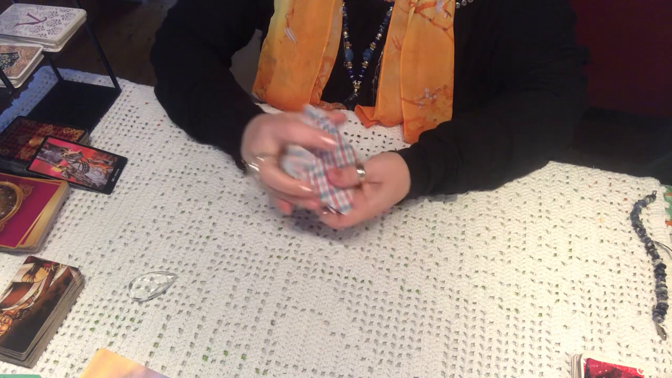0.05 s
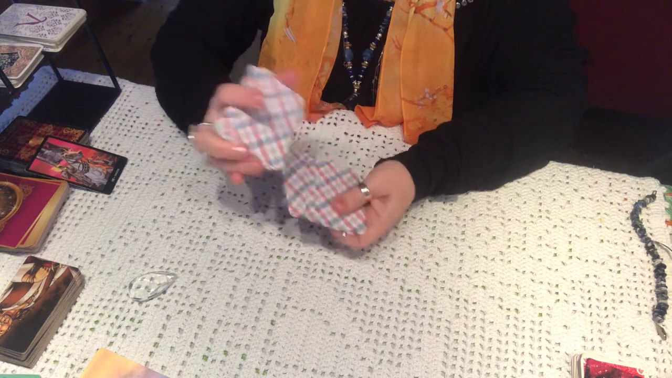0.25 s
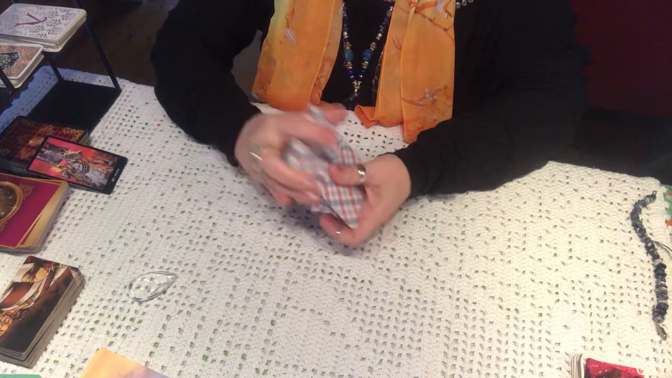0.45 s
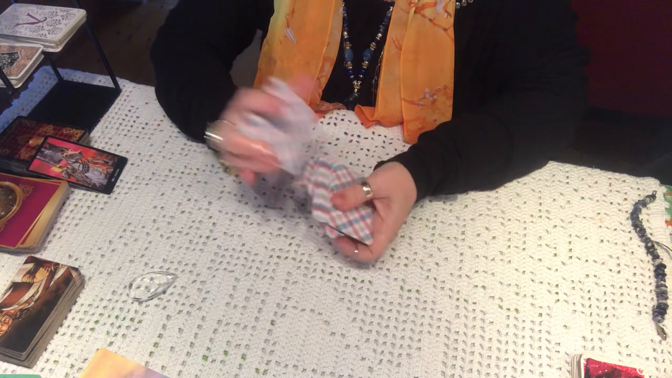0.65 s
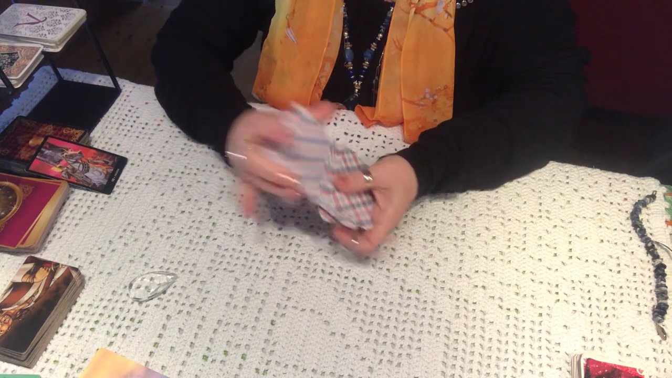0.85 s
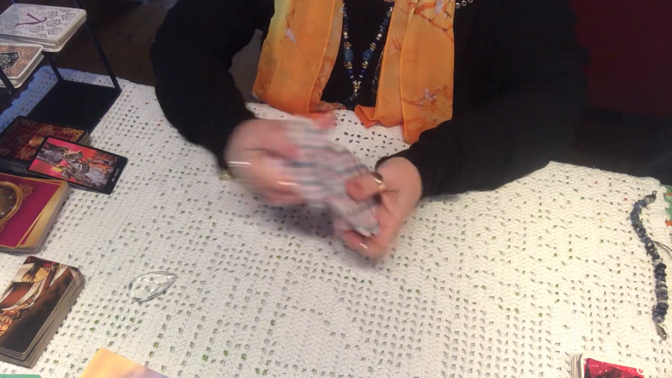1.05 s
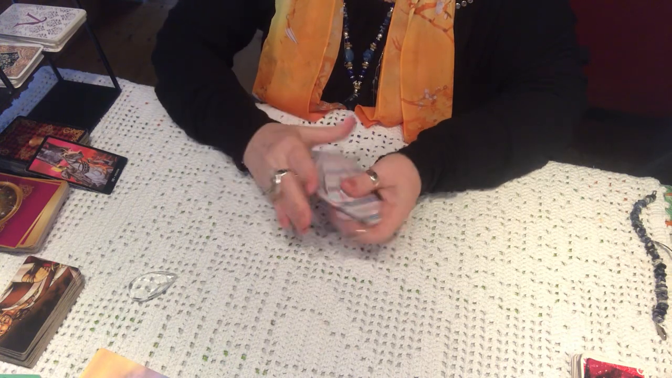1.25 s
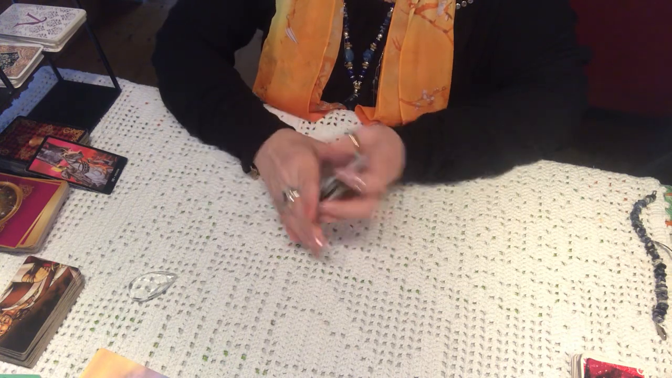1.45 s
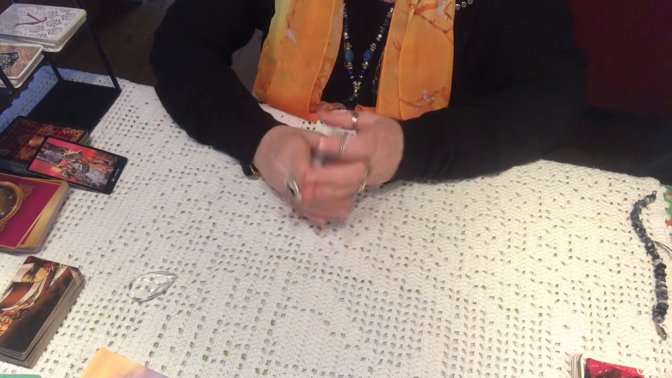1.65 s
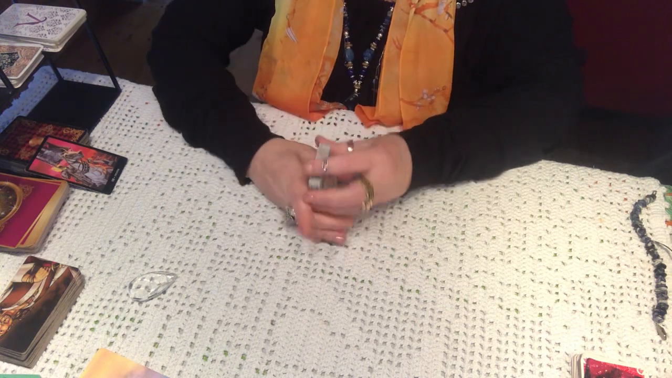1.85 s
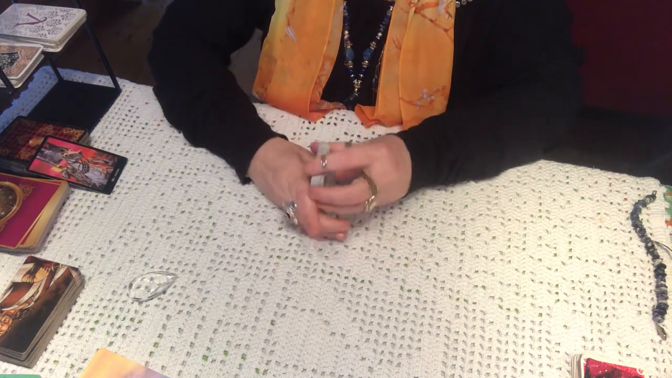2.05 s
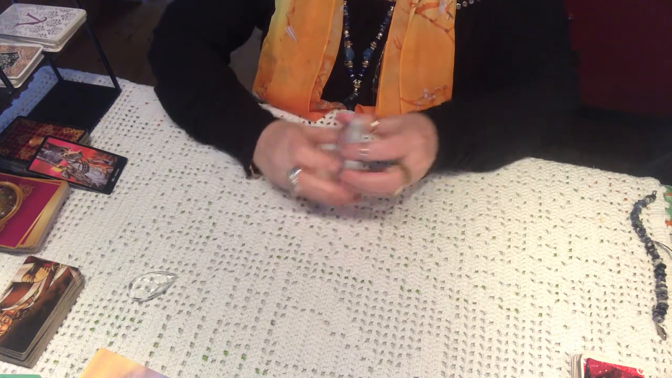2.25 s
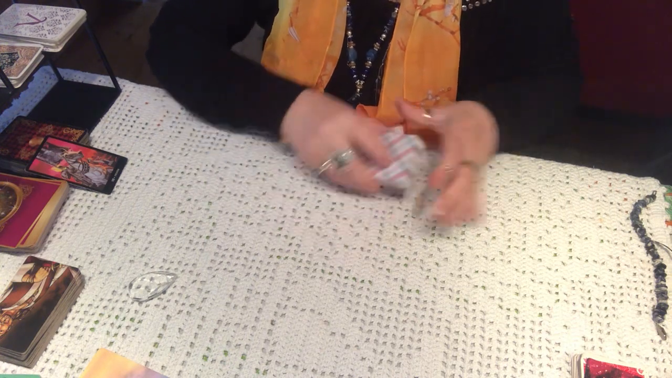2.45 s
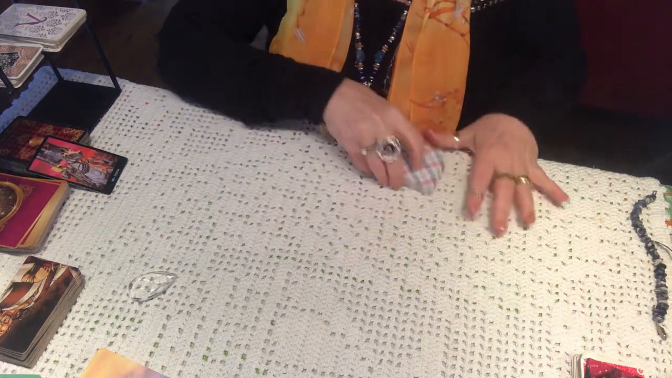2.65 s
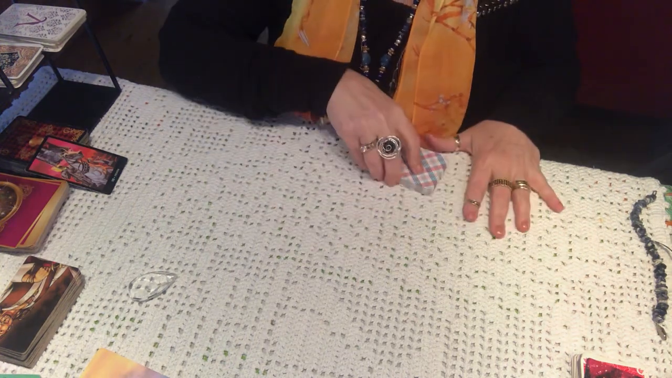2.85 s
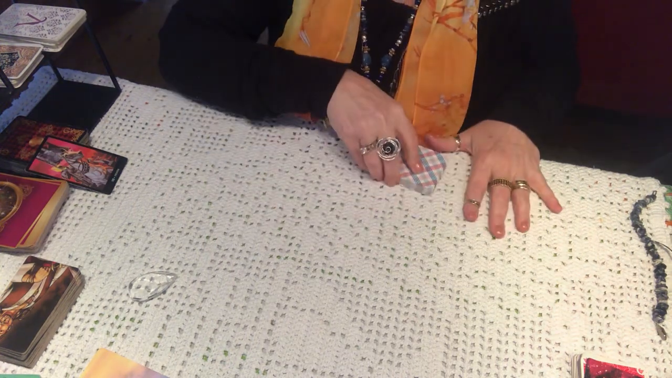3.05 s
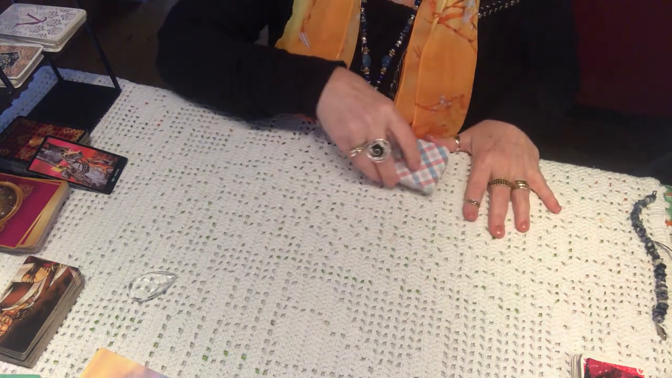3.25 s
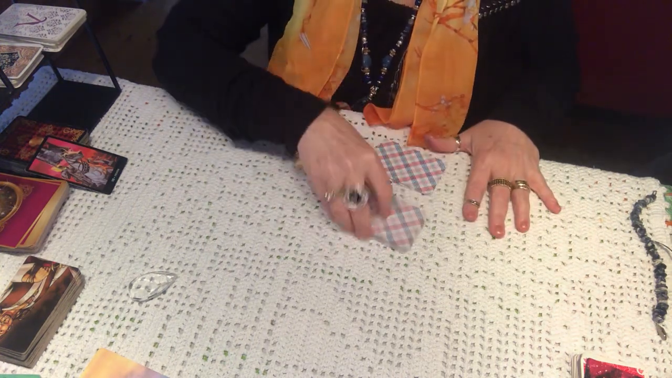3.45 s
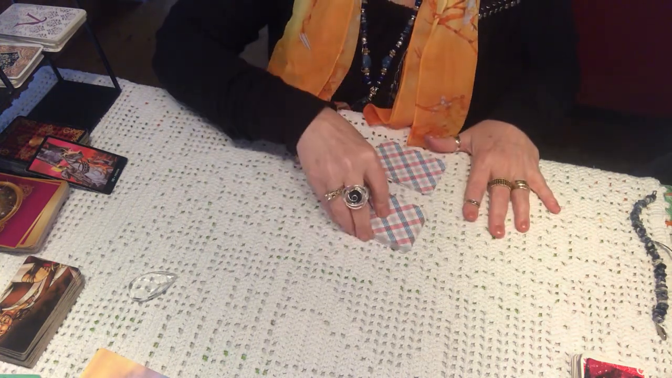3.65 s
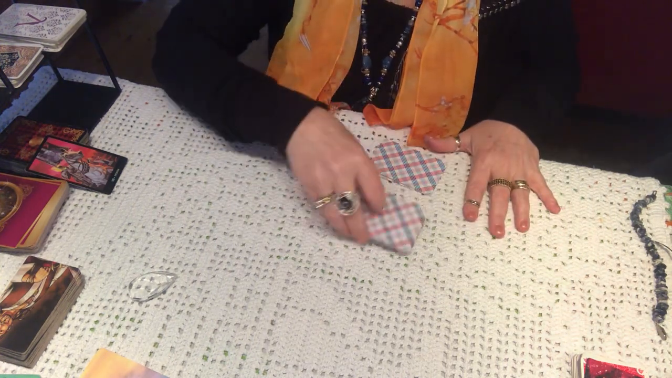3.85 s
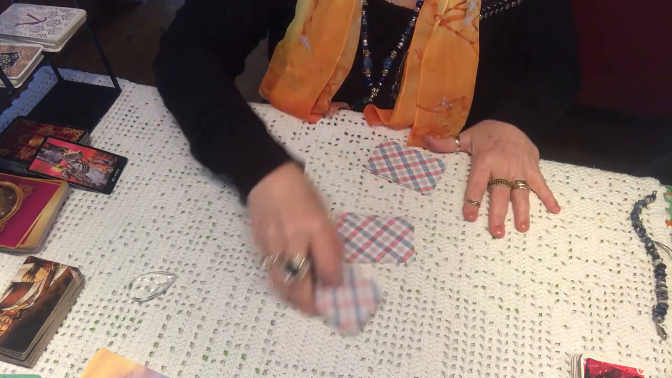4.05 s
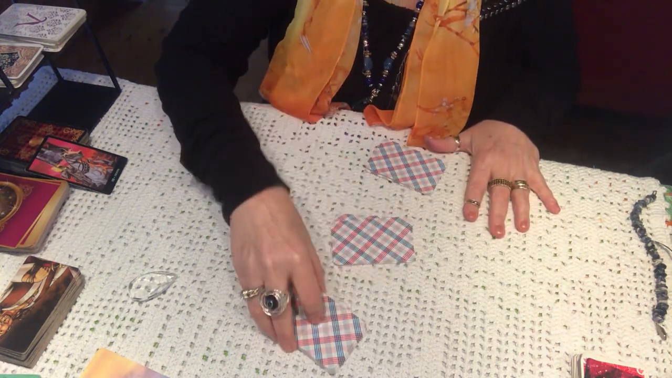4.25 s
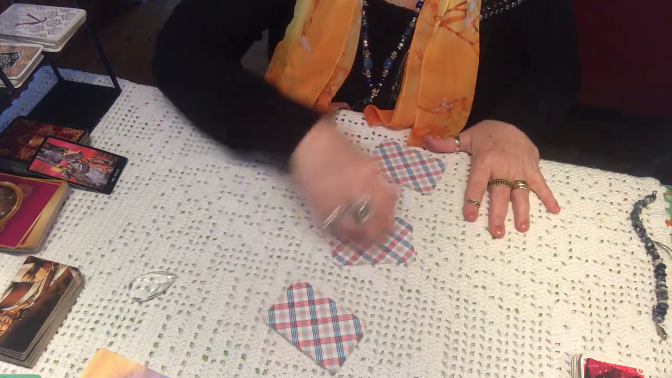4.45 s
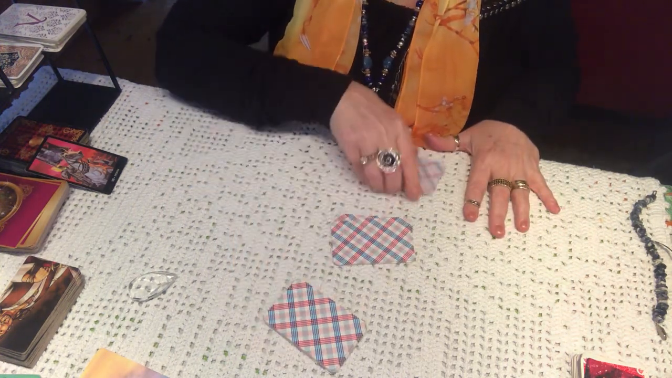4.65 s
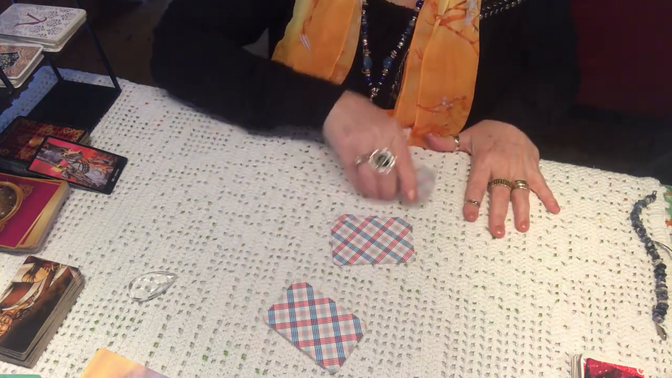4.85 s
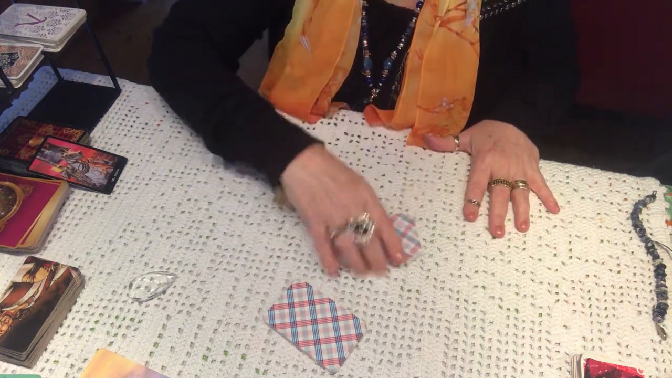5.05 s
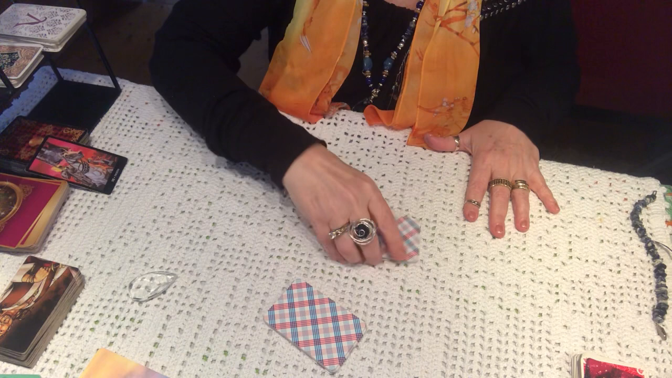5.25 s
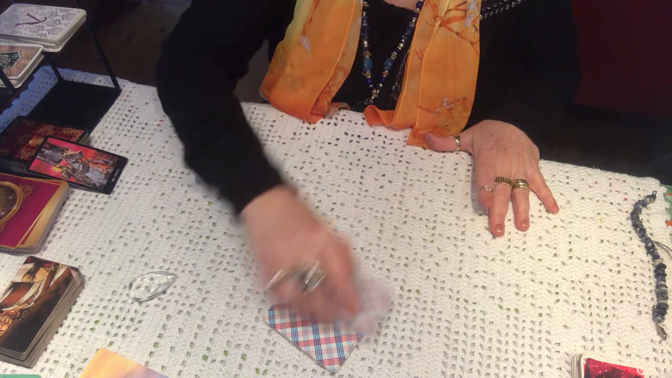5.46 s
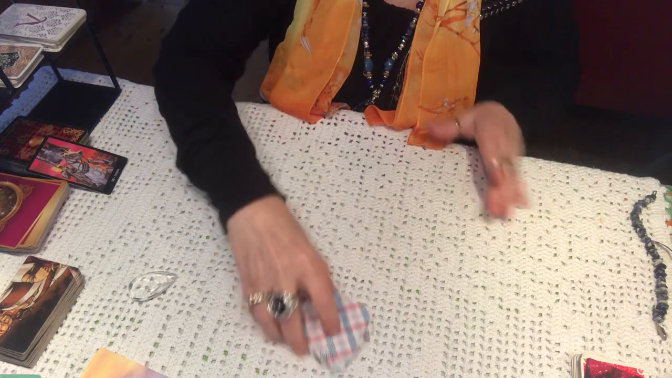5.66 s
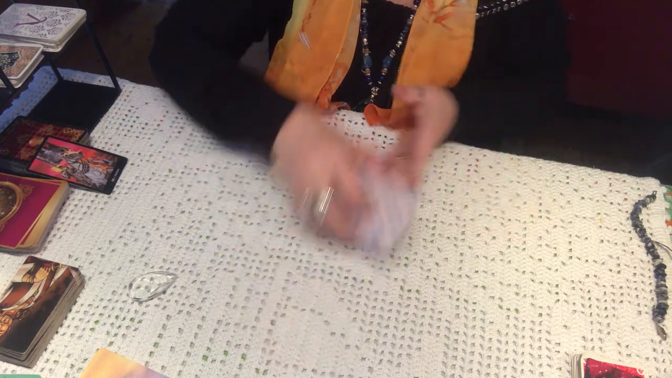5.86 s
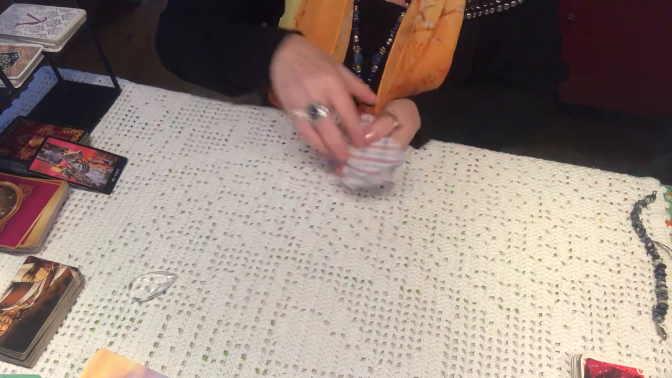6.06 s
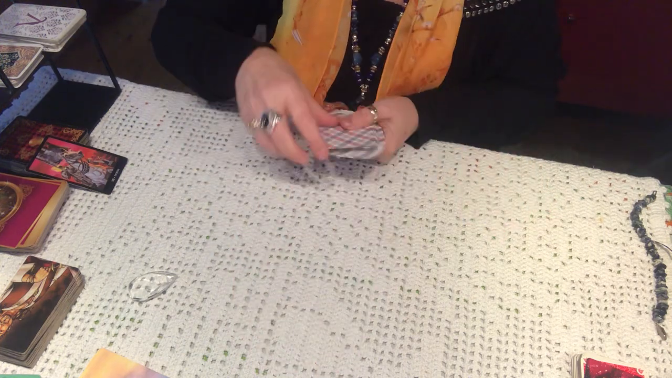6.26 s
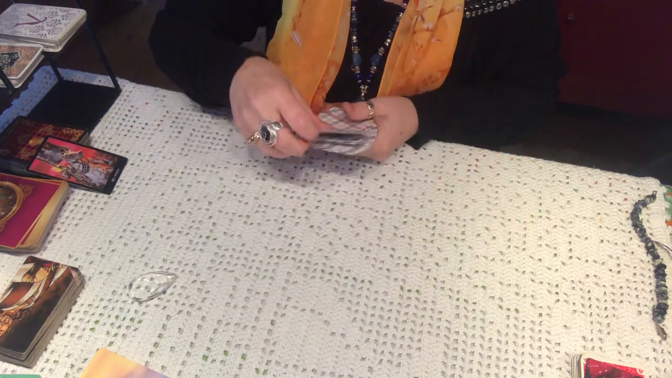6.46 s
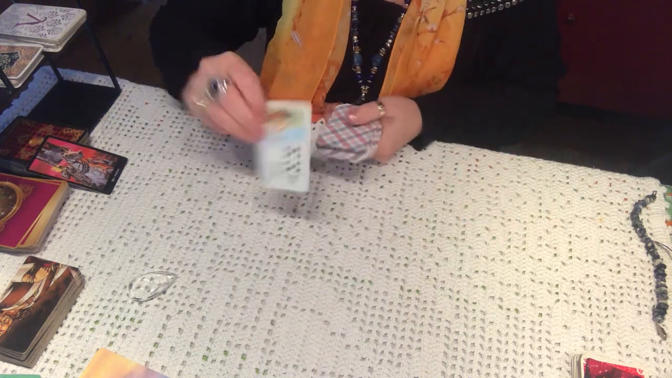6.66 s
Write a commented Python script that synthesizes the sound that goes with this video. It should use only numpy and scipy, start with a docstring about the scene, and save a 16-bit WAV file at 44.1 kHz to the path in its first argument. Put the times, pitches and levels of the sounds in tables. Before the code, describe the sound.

A deck of cards is shuffled overhand near the microphone, brisk swishes and snapping edges with faint metallic ticks from finger rings. Low padded thuds follow as hands square the deck and set it on a cloth-covered table. Piles are placed almost silently, with light taps, soft rubs and thin, very high flickers. The piles are stacked with one strong knock, swept up and shuffled again with a sharp clack. Small indoor room, low hiss.

```python
"""Card faces rub softly, then packet edges clack and thump as hands shuffle a small deck in a quiet room.
The deck is set on a cloth-covered table and cut into piles; finger rings clink, thin very high tones flicker.
Rubs are roughened noise through a moving resonance; clacks and thumps are short swings plus noise bursts.
Clinks and high tones are dying sines of jittering level; sparse taps add a short room tail, over steady hiss."""
import sys
import numpy as np
from scipy import signal
from scipy.io import wavfile
from scipy.ndimage import uniform_filter1d

SR = 44100
rng = np.random.default_rng(int(sys.argv[2]) if len(sys.argv) > 2 else 0)


def wav_record(signal):
    """Record a signal, one row per channel, as 16-bit PCM in the file named by sys.argv[1]."""
    frames = np.transpose(np.atleast_2d(signal))
    bounded = np.clip(frames, -1, 1)
    # unit amplitude maps onto the largest positive 16-bit level
    quanta = np.round(bounded * 32767).astype(np.int16)
    wavfile.write(sys.argv[1], SR, quanta)


N = 295911
CONTROL_STEP = 64  # samples per point of the slide controls


def amp(db):
    """Decibels to gain."""
    return 10 ** (np.asarray(db) / 20)


def evened(x):
    """Scales to rms 1."""
    return x / np.sqrt(np.mean(x ** 2) + 1e-20)


def read(points, hz):
    """Interpolates a table on a log-frequency axis."""
    f, value = np.transpose(points)
    return np.interp(np.log(hz + 1), np.log(f + 1), value)


def add(mix, s, sound):
    """Mixes a sound in at s seconds."""
    part = mix[round(s * SR):][:len(sound)]
    part += sound[:len(part)]


def band(x, lo_hz, hi_hz, order=2):
    """Butterworth band-pass."""
    return signal.sosfilt(signal.butter(order, [lo_hz, hi_hz], "bandpass", fs=SR, output="sos"), x)


def coloured(x, points, patchy_db):
    """Gives x a spectrum that drifts in small patches of time and frequency; rms 1."""
    hz, _, z = signal.stft(x, SR, nperseg=1024, noverlap=768)
    patches = uniform_filter1d(rng.standard_normal(z.shape), size=12, axis=0)
    patches = uniform_filter1d(patches, size=10, axis=1)
    z = z * amp(read(points, hz)[:, None] + patchy_db * evened(patches))
    return evened(signal.istft(z, SR, nperseg=1024, noverlap=768)[1][:N])


def ring(modes, seconds):
    """Sum of dying sines, one per (Hz, dB, t60 s) mode."""
    t = np.arange(round(seconds * SR)) / SR
    return sum(amp(db - 60 * t / max(t60, .005)) * np.sin(2 * np.pi * hz * t) for hz, db, t60 in modes)


def push(hz, turns, crest):
    """A soft blow: a few swings under a smooth hump, the main crest at a share of its length."""
    u = np.arange(round(turns / hz * SR)) / SR * hz
    hump = np.sin(np.pi * u / turns) ** 2
    return hump * np.cos(2 * np.pi * (u - crest * turns))


def chatter(noise, count, depth_db):
    """Quick random swings of gain, interpolated between noise points spread over count samples."""
    return np.interp(np.arange(count), np.linspace(0, count, len(noise)), amp(depth_db * noise))


def resonate(x, hz, width_hz):
    """Moving resonance: shifts the curve hz down to zero, smooths, shifts back."""
    turn = np.exp(2j * np.pi * np.cumsum(hz) / SR)
    r = np.exp(-np.pi * width_hz / SR)
    return 2 * (turn * signal.lfilter([1 - r], [1, -r], x / turn)).real


# (frequency [Hz], relative density [dB per Hz])
HISS_SPECTRUM = [(15, -24.5), (25, 4), (48, 0), (161, -9), (236, -6), (363, -1.5), (427, -15.5),
                 (840, -12.5), (936, -9.5), (1130, -9.5), (1480, -13.5), (6380, -16.5), (16000, -31.5)]
HISS_RMS_DB = -71.5


def hiss():
    """Steady background noise, its spectrum slightly patchy."""
    return amp(HISS_RMS_DB) * coloured(rng.standard_normal(N), HISS_SPECTRUM, patchy_db=3)


STROKE_SPAN_DB = 20  # fall over one build-up or die-away time


def stroke(s, db, build_s, die_s):
    """Power of a gesture that swells to its fastest moment and dies away."""
    t = np.arange(0, N + CONTROL_STEP, CONTROL_STEP) / SR - s
    spans = np.where(t < 0, -t / max(build_s, .005), t / max(die_s, .005))
    return amp(db - STROKE_SPAN_DB * spans) ** 2


# rubbed cards: (frequency [Hz], relative density [dB per Hz])
RUB_SPECTRUM = [(300, -9.5), (800, -6), (1500, -9), (3000, -7), (4500, -4), (7000, -5), (10500, -11),
                (13500, -3), (16000, -3)]
# card faces sliding: (fastest moment [s], rub level [dB], build-up [s], die-away before AIR_FADE [s],
# airy treble re rub [dB], pitch of the gap between the cards [Hz])
SLIDE_STROKES = [(.15, -66, .6, 0.092, -1, 2420), (0.214, -52, 0.059, 0.062, 5.5, 3280),
                 (.388, -48.5, 0.013, 0.077, -18, 1630), (0.464, -47.5, 0.07, .04, -23, 1650),
                 (0.534, -48.5, 0.036, 0.092, -14, 2000), (0.812, -54, 0.047, 0.21, -26, 2310),
                 (.91, -54, 0.082, 0.048, -2, 2970), (1.12, -60, 0.087, 0.37, 2.5, 2700),
                 (1.27, -69, .3, .2, -13, 2780), (1.399, -60.5, 0.057, 0.057, -20, 2780),
                 (1.478, -54.5, 0.058, 0.084, -5.5, 2800), (1.61, -63, 0.031, 0.11, 1.5, 2800),
                 (2.31, -66, 0.51, .25, -26, 2480), (2.76, -68, 0.17, 0.085, -18, 1500),
                 (4.15, -69.5, .13, 0.26, -1, 2300), (4.296, -58.5, 0.025, 0.017, 4, 3500),
                 (4.69, -65, 0.17, 0.26, -5, 1970), (4.845, -68, 0.043, 0.026, -18, 3280),
                 (4.87, -63, .02, 0.017, -23, 3100), (5.20, -60.5, 0.12, .09, -1.5, 2260),
                 (5.60, -60.5, 0.034, 0.31, 2, 1390), (5.80, -67.5, 0.56, 0.037, -16, 2080),
                 (5.98, -61.5, .02, 0.18, 3, 2770), (6.56, -73, 0.1, 0.076, -12, 4200),
                 (6.63, -52.5, 0.16, 0.11, -6.5, 3860)]
REST_DB, REST_AIR_DB, REST_HZ = -81.5, 5.5, 2420  # fingers resting on the cards: rub, air re rub, gap pitch
AIR_FADE = 1.26  # treble dies this many times faster than the rub
FLUTTER_DB = 1.6  # uneven catches of a few ms as card edges pass
GAP_DB, GAP_PER_AIR = -7.5, -0.96  # gap colour re rub at equal air; exponent on air/rub: less air, more colour
DRAG_DB = -71  # arms resting and shifting on the cloth
SWEEP = (5.77, -59.5, .45, .08)  # a pile swept up: (time [s], level [dB], build-up [s], die-away [s])


def slides():
    """Rubbing is noise roughened by small slips; the air gap between cards colours it; arms drag on cloth."""
    rest = amp(REST_DB) ** 2
    strokes = np.array([stroke(s, db, build, die) for s, db, build, die, _, _ in SLIDE_STROKES])
    rub_power = strokes.sum(0) + rest
    air_power = sum(stroke(s, db + air_db, build, die / AIR_FADE)
                    for s, db, build, die, air_db, _ in SLIDE_STROKES)
    air_power = air_power + rest * amp(REST_AIR_DB) ** 2
    drag_power = stroke(*SWEEP) + amp(DRAG_DB) ** 2
    # root of the power-weighted mean pitch is not taken: pitch is averaged directly
    gap_hz = (np.transpose(SLIDE_STROKES)[5] @ strokes + rest * REST_HZ) / rub_power

    rub_gain, air_gain, drag_gain = (np.sqrt(p).repeat(CONTROL_STEP)[:N]
                                     for p in (rub_power, air_power, drag_power))
    gap_hz = gap_hz.repeat(CONTROL_STEP)[:N]
    gap_gain = amp(GAP_DB) * (air_gain / rub_gain) ** GAP_PER_AIR

    slip_sizes = np.minimum(rng.exponential(1, N // CONTROL_STEP + 1), 4)
    slips = amp(1.8 * slip_sizes).repeat(CONTROL_STEP)[:N]
    flutter = chatter(rng.standard_normal(N // 256), N, FLUTTER_DB)
    rub = coloured(rng.standard_normal(N) * slips * flutter, RUB_SPECTRUM, patchy_db=1.5)
    air = signal.sosfilt(signal.butter(2, 6500, "highpass", fs=SR, output="sos"), rub)
    gap = resonate(resonate(rub, gap_hz, width_hz=2900), gap_hz, width_hz=2900)
    body = evened(rub - air) + gap_gain * evened(gap)
    body = body / np.sqrt(1 + gap_gain ** 2)
    drag = evened(band(rng.standard_normal(N), 44, 252, order=1))
    return rub_gain * body + air_gain * evened(air) + drag_gain * drag


# card edges meeting: (time [s], level [dB], pitch of the packet [Hz], treble crack re level [dB])
EDGE_CLACKS = [(0.228, -29, 2000, -7.5), (0.235, -31, 1120, -11.5), (0.369, -45.5, 1090, -9),
               (0.383, -36, 1420, -4.5), (0.397, -27, 1730, -16), (0.439, -48, 1140, 2),
               (0.451, -37, 1480, -18), (0.461, -30, 1470, -17), (0.526, -25.5, 1580, -8),
               (0.541, -25, 3080, -30), (0.545, -30, 1170, -24), (0.773, -45, 1110, -6.5),
               (0.781, -39, 2500, -11), (0.798, -42.5, 1290, -17), (0.82, -38, 1260, -14.5),
               (0.903, -37, 3030, -19), (0.925, -33, 1194, -11), (1.083, -56.5, 1130, 2),
               (1.1, -60, 2770, -5), (1.108, -49.5, 1190, -3.5), (1.132, -50, 1800, -7),
               (1.259, -47, 1120, -14), (1.29, -55, 1470, -5), (1.416, -45.5, 2520, -24),
               (1.482, -34, 2920, -12.5), (1.519, -42, 2660, -13), (1.603, -57, 3120, 2),
               (2.773, -41, 1130, -23), (3.694, -64.5, 5000, 8.5), (4.15, -51.5, 2190, -14),
               (4.289, -57, 3100, -2), (4.453, -70, 5000, 7.5), (4.686, -52, 1450, -1),
               (5.065, -50, 2520, -1.5), (5.204, -57, 1340, -11), (5.547, -39.5, 1100, -7.5),
               (5.551, -14.5, 1150, -38), (5.558, -65, 4000, 1), (5.719, -45, 1460, -6),
               (5.782, -41, 2010, -19), (5.968, -41, 2400, -5), (6.654, -24, 1810, -12.5),
               (6.68, -39, 1150, -25)]
RATTLE_T60_S = 0.035  # the crack dies twice as fast
RATTLE_DB, RATTLE_PER_CRACK = -0.5, 0.57  # rattle re level; dB per dB of crack below 0


def clacks():
    """A rattling noise burst starts almost at once and dies away, with a two-cycle swing and a brighter crack."""
    out, lead = np.zeros(N), 512
    t = np.arange(-lead, 2048) / SR
    rise = np.exp(np.minimum(t, 0) / 0.00013)
    fade = np.where(t < 0, rise, amp(-60 * t / RATTLE_T60_S))
    noises = rng.standard_normal((len(EDGE_CLACKS), 2, len(t)))
    for (s, db, hz, crack_db), noise in zip(EDGE_CLACKS, noises):
        rattle = evened(band(noise[0], hz * .5, hz * 2)) * fade
        rattle = band(rattle, hz * 0.31, hz * 1.64)
        rattle_db = RATTLE_DB + RATTLE_PER_CRACK * min(crack_db, 0)
        crack = evened(band(noise[1], 3100, 6600, order=1)) * fade ** 2
        add(out, s - lead / SR, amp(db) * (amp(rattle_db) * rattle + amp(crack_db) * crack))
        add(out, s - .0005, amp(db) * push(hz, turns=2.2, crest=.5))
    return out


# packets, fingers and palms landing on the table:
# (time [s], push level [dB], push pitch [Hz], table ring re push [dB], slap of the cards re push [dB])
TABLE_THUMPS = [(0.231, -52.5, 315, -14, 19), (1.501, -28.5, 234, -12.5, -13), (1.833, -23, 185, -12, -15),
                (2.694, -51.5, 153, -1.5, -1.5), (2.738, -50, 131, -14, -9),
                (2.769, -28, 167, -12.5, -10.5), (2.797, -38.5, 304, -18.5, -26),
                (3.487, -39, 168.5, -12, -9.5), (4.126, -53, 210, -7.5, -27), (4.2, -62, 177, -1, -22),
                (4.263, -54, 248, -15, -24), (4.291, -46, 165, -16, -10), (4.601, -63, 155, 2.5, -21),
                (4.718, -57, 165, -2, 4), (5.047, -50.5, 190, -4.5, -15), (5.064, -47, 155, -4, -9),
                (5.205, -48, 220, -9, 2.5), (5.549, -28.5, 213, -13, -7.5), (5.583, -42, 114, -11, -13),
                (5.642, -37.5, 182, -13.5, -33), (5.719, -48, 185, -6, -13), (5.78, -50, 185, -28, 2),
                (6.654, -42, 326, -6.5, -32.5)]
# dense ring of the damped table top under a 200 Hz push: (frequency [Hz], level [dB], t60 [s])
TABLE_RING = [(41, -12.5, 0.17), (120, -3.5, 0.41), (199, 2.5, 0.18), (340, -2, 0.25), (442, -5.5, 0.13),
              (620, -15, 0.25), (1090, -21, 0.2), (1930, -49, 0.4)]
# clear low modes of the table top under a 200 Hz push: (frequency [Hz], level [dB], t60 [s])
TABLE_BOOM = [(116.2, -10, 0.65), (44, -15.5, 0.42)]


def thumps():
    """A low push through the cloth and a dull slap; the top rings higher for a smaller, harder blow."""
    out, t = np.zeros(N), np.arange(24576) / SR
    f, level_db, t60 = np.transpose(TABLE_RING)
    noises = rng.standard_normal((len(TABLE_THUMPS), 2, len(t)))
    for (s, db, hz, ring_db, slap_db), noise in zip(TABLE_THUMPS, noises):
        hard = hz / 200
        bins, frames, z = signal.stft(noise[0], SR, nperseg=1024)
        start_db = read(np.c_[f * hard, level_db], bins)[:, None]
        fall_db = 60 * frames / read(np.c_[f, t60], bins)[:, None]
        dense = 8.1 * signal.istft(z * amp(start_db - fall_db), SR, nperseg=1024)[1][:len(t)]
        table = dense + ring(TABLE_BOOM, len(t) / SR) / hard ** 1.7
        slap = evened(band(noise[1], 303, 1060)) * amp(-60 * t / 0.074)
        add(out, s + .002, amp(db) * push(hz, turns=2.6, crest=.62))
        add(out, s + 0.00368, amp(db + ring_db) * table * (1 - np.exp(-t / 0.0041)))
        add(out, s + 0.00169, amp(db + slap_db) * slap * (1 - np.exp(-t / 0.011)))
    return out


# thin, very high tones: (time [s], level [dB], pitch [Hz])
HIGH_TONES = [(0.5444, -60, 15600), (0.791, -49, 14500), (0.8629, -55, 13300), (0.911, -64, 13400),
              (1.0163, -53.5, 15200), (1.1378, -59, 15500), (1.3134, -55, 13600), (2.3695, -64, 13700),
              (2.408, -55, 15760), (2.6903, -61, 14300), (4.0811, -64, 14100), (4.455, -57, 15300),
              (4.46, -56, 14000), (4.5426, -58, 15500), (4.582, -60, 13200), (4.8284, -72, 13400),
              (4.582, -56, 15400), (4.6563, -55, 15500), (4.6887, -52, 15300), (5.084, -58, 13600),
              (5.211, -56, 15500), (5.7166, -68, 13800), (5.925, -55.5, 13700), (6.0821, -60, 13800)]


def high_tones():
    """Thin, flickering, very high tones, each with a faint tick and five weaker short tones within .2 s."""
    out, pitches_hz = np.zeros(N), np.transpose(HIGH_TONES)[2]
    noises = rng.standard_normal((len(HIGH_TONES), 40))
    follower_draws = rng.random((len(HIGH_TONES), 5, 2))
    for (s, db, hz), noise, followers in zip(HIGH_TONES, noises, follower_draws):
        tone = ring([(hz, -4, .08)], .15)
        tone = tone * chatter(noise, len(tone), depth_db=5.0)
        tick = np.diff(noise) * np.hanning(len(noise) - 1)
        add(out, s, amp(db) * tone)
        add(out, s, amp(db) * tick)
        for late, which in followers:  # random delay, random pitch from the table
            follower_hz = pitches_hz[int(which * len(pitches_hz))]
            add(out, s + .2 * late, amp(db) * ring([(follower_hz, -12, .025)], .1))
    return out


# a finger ring knocks another: (time [s], level [dB])
RING_CLINKS = [(0.7672, -45), (0.833, -57), (0.973, -64), (1.275, -57.5), (1.442, -57.5), (1.85, -52),
               (4.7237, -55), (5.1074, -42), (5.2013, -55.5), (5.307, -54), (5.584, -31), (5.6145, -44),
               (6.137, -59)]
# modes of the metal band: (frequency [Hz], level re clink [dB], t60 [s])
RING_MODES = [(5680, 3.5, 0.037), (5740, -10.5, 0.22), (5750, -28, 0.26), (5130, -7.5, 0.031),
              (6050, -29, .03), (7860, -22, 0.083), (10070, -12.5, 0.02), (14400, -12.5, 0.058)]
TICK_DB, TICK_GROWTH = -3, 0.93  # tick re a -43.5 dB clink; further dB per dB of harder knock


def clinks():
    """Metal rings: a sharp tick and the close modes of the band, which goes on chattering."""
    out, metal = np.zeros(N), ring(RING_MODES, 0.46)
    noises = rng.standard_normal((len(RING_CLINKS), 2, 128))
    for (s, db), noise in zip(RING_CLINKS, noises):
        jangle = metal * chatter(noise[1], len(metal), depth_db=3.0)
        tick = band(noise[0], 3800, 11000) * amp(-.3 * np.arange(128))
        tick_db = db + TICK_DB + TICK_GROWTH * (db + 43.5)
        add(out, s - .0005, amp(db) * jangle)
        add(out, s - .0005, amp(tick_db) * tick)
    return out


# room tail: (frequency [Hz], t60 [s])
ROOM_T60 = [(200, 0.45), (1000, 0.4), (4000, 0.48), (12000, 0.046)]
ROOM_DB = -17  # gain of the unit-energy tail


def room(x):
    """Sparse taps of random sign, each band dying at its own speed."""
    taps = np.zeros(SR // 2)
    at = np.arange(200, len(taps) - 20, 20)
    taps[at + rng.integers(0, 20, len(at))] = rng.choice([-1., 1.], len(at))
    hz, t, z = signal.stft(taps, SR, nperseg=256)
    z = z * amp(-60 * t / read(ROOM_T60, hz)[:, None])
    tail = signal.istft(z, SR, nperseg=256)[1]
    return amp(ROOM_DB) * signal.fftconvolve(x, tail / np.linalg.norm(tail))[:N]


def scene():
    """Hands, cards, table and high tones, their room tail, and the steady hiss."""
    near = slides() + clacks() + thumps() + high_tones() + clinks()
    return (near + room(near) + hiss())[None]


EDGE_HZ = 15750


def record(dry):
    """Band limit: a steep linear-phase low-pass."""
    low_pass = signal.firwin(511, EDGE_HZ, window=("kaiser", 9), fs=SR)
    return signal.oaconvolve(dry, low_pass[None], "same")


dry = scene()
out = record(dry)
wav_record(out)
```